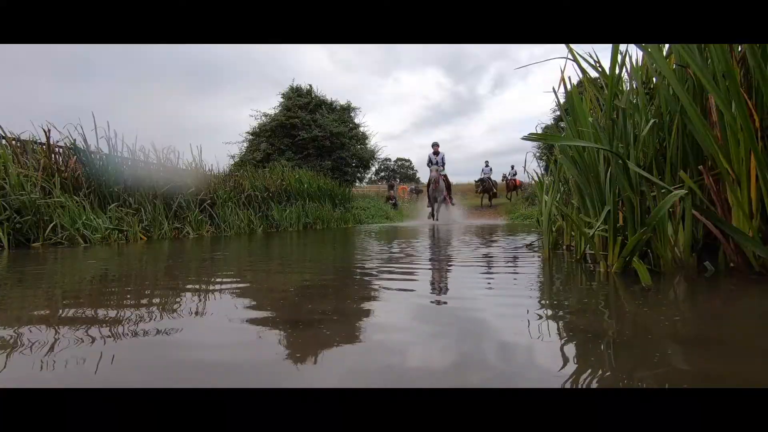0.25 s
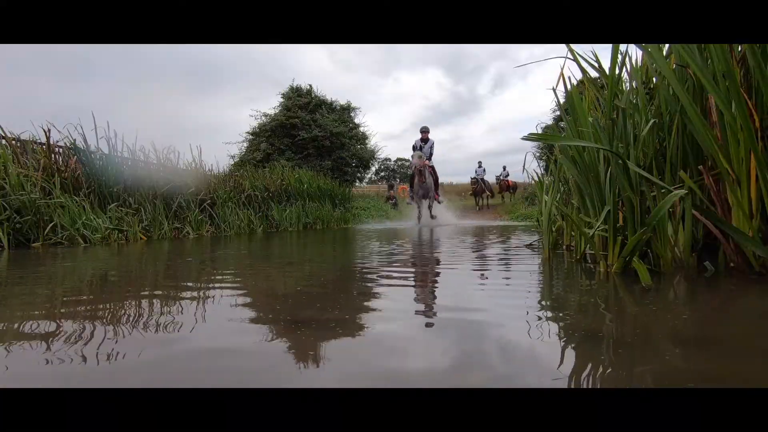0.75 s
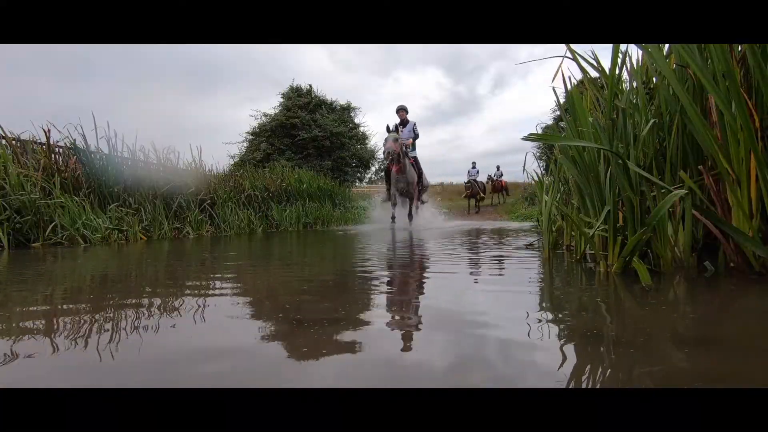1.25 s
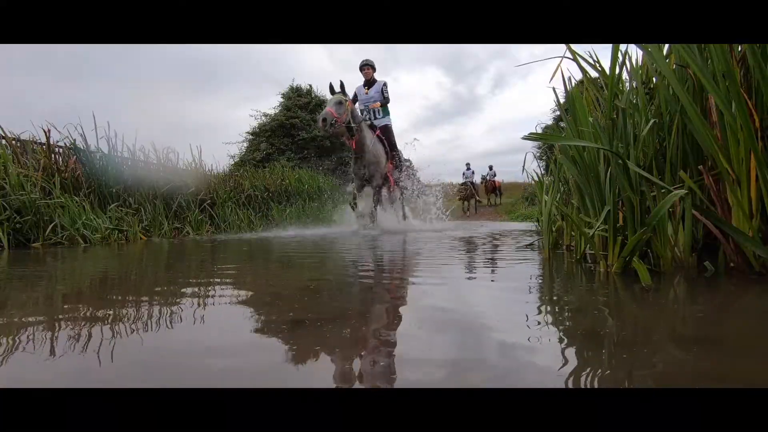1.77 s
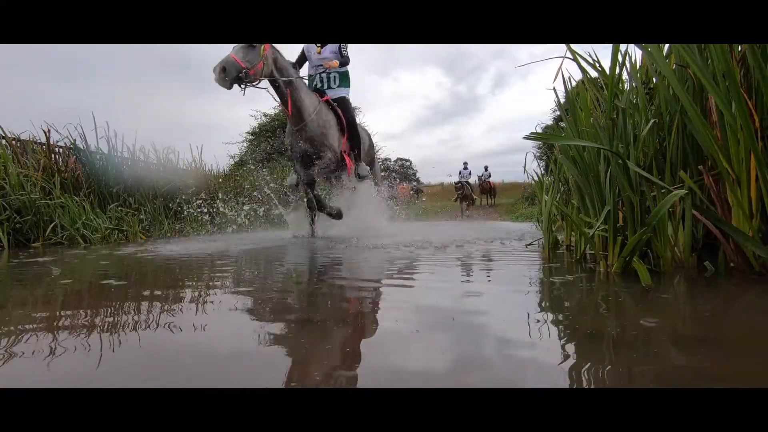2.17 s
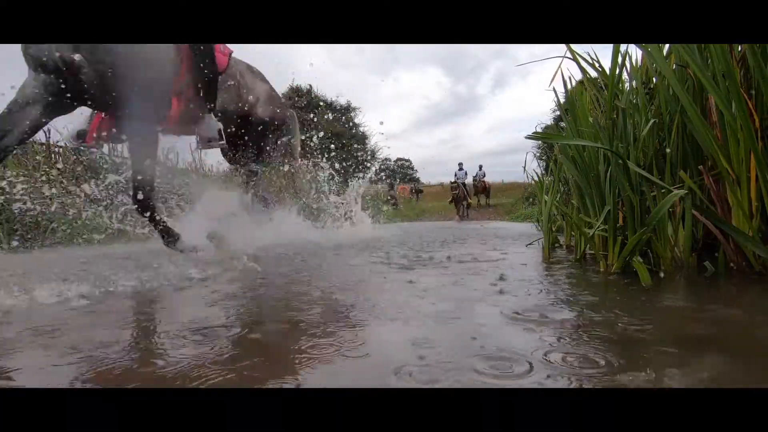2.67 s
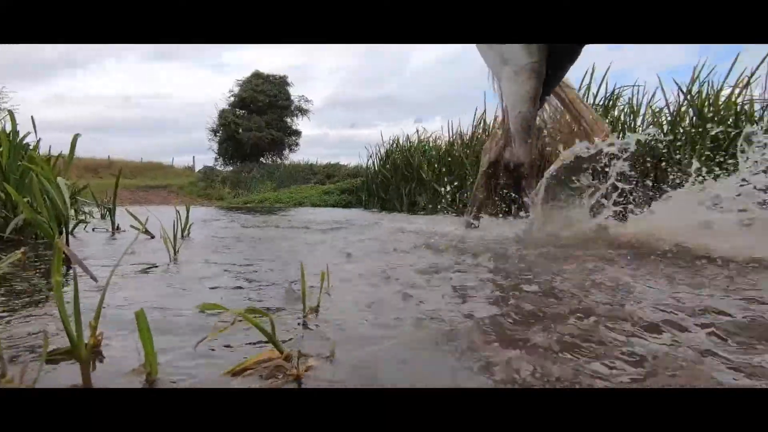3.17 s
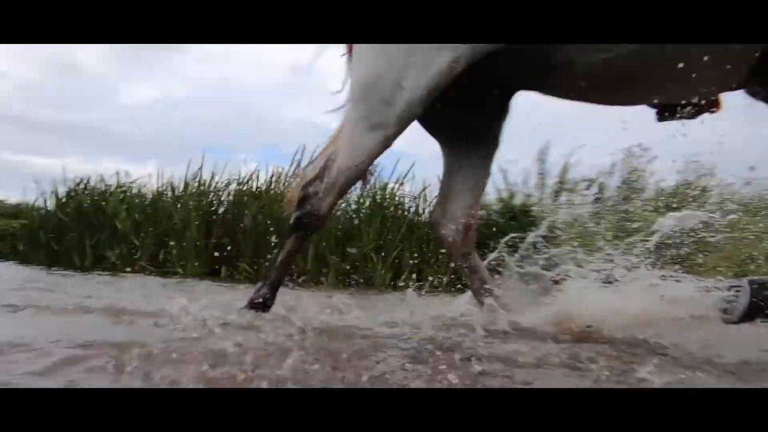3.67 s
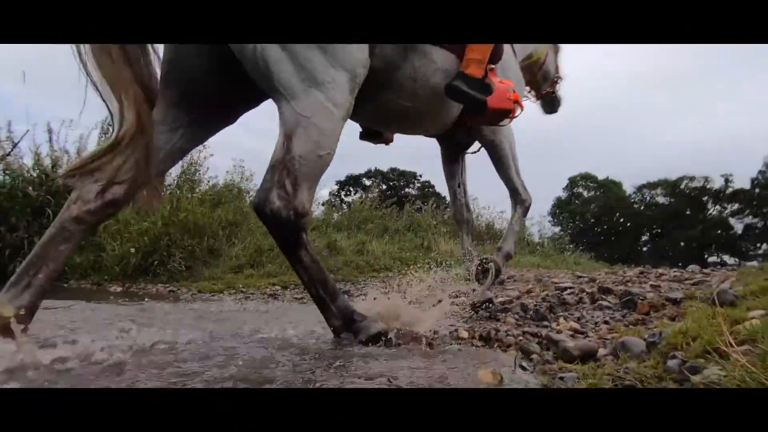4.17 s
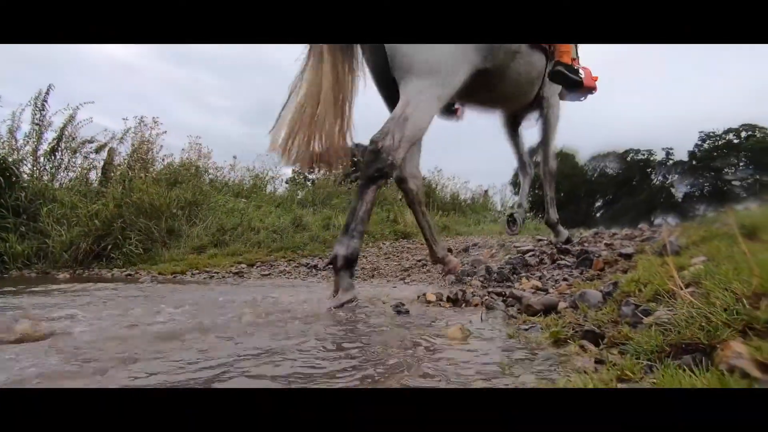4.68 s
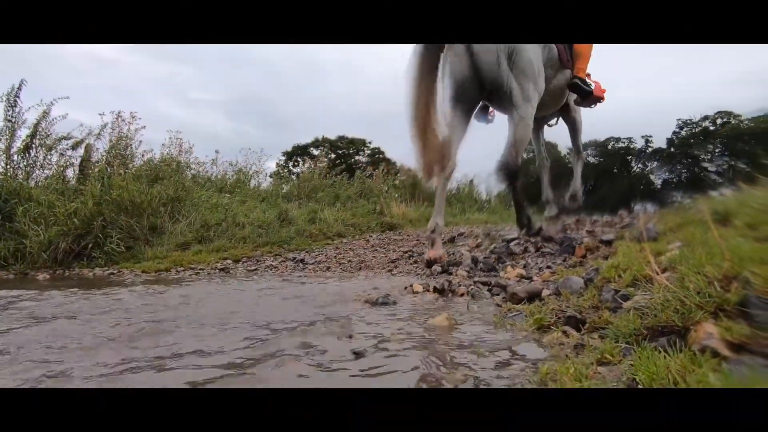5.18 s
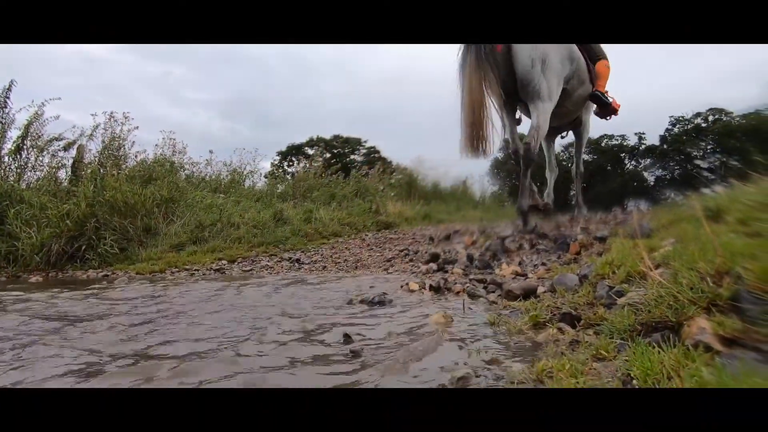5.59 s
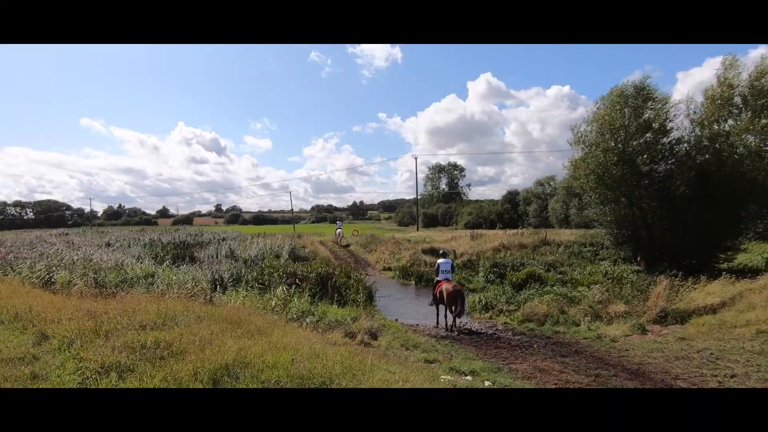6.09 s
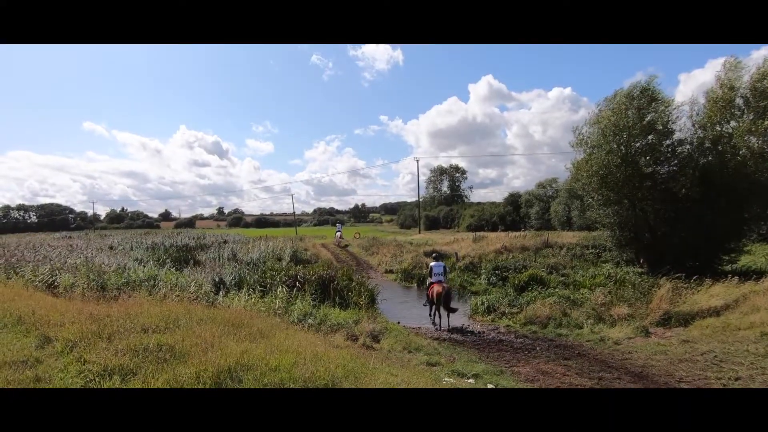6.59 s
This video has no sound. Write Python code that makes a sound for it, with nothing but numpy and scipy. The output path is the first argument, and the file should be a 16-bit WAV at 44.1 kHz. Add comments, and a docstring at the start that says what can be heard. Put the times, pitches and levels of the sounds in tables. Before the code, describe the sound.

A horse trots closer through a shallow ford with muffled plopping splashes, clambers out over clicking pebbles, then wades far off under low wind rumble.

```python
"""A horse trots up through a shallow ford: ringing air pockets plop, noise bursts smack, bubble streams churn and spray.
Wet microphone ports muffle it; from 1.7 s the left one drains, turns phase ahead and lets in bright spray.
From 3 s, in a second view, the horse climbs out over pebbles: short pitched knocks, gliding glugs and low wind,
with a gust thumping on the microphone from 4.25 to 4.38 s. From 6 s, in a third view up the field,
a horse wades far off in thin noise cracks and small plops, while low wind noise buffets the microphone."""
import sys
import numpy as np
from scipy import signal
from scipy.fft import rfft, irfft, next_fast_len
from scipy.io import wavfile
from scipy.ndimage import uniform_filter1d, minimum_filter1d, map_coordinates

SR = 44100
rng = np.random.default_rng(int(sys.argv[2]) if len(sys.argv) > 2 else 0)


def digitize_waveform(pressure):
    """Quantize a signal to 16-bit integers and store it at the path in sys.argv[1].

    Rows of a 2-D input are taken as channels; values are limited to [-1, 1].
    """
    field = np.atleast_2d(pressure).T
    bounded = np.clip(field, -1, 1)
    quanta = np.round(bounded * 32767).astype(np.int16)
    wavfile.write(sys.argv[1], SR, quanta)


N = 301671

# Event levels in the tables are before each layer's level_db trim; colours are relative, as coloured() sets rms 1.
# Largest air pockets opened by the hooves. Each row: start in seconds, level in dB, first pitch in Hz, t60 in seconds.
POCKETS = [(0.107, -17.5, 213, 0.057), (0.126, -15.5, 172, .025), (0.156, -10, 170, 0.04),
           (.297, -11, 580, 0.0078), (0.331, -15.5, 434, 0.085), (0.394, -12, 228, 0.0145),
           (0.458, -14, 402, 0.01), (0.529, -18, 238, 0.025), (.605, -21, 1840, 0.033),
           (.607, -13.5, 618, 0.018), (.742, -10.5, 307, 0.013), (0.782, -13.5, 272, 0.014),
           (.826, -14.5, 198, 0.019), (.838, -2, 222, 0.022), (.903, -13, 756, 0.014),
           (.92, -17.5, 527, 0.079), (1.153, -18.5, 568, 0.069), (1.187, -11, 277, 0.027),
           (1.217, -13, 226, 0.041), (1.291, -12.5, 273, 0.024), (1.504, -16, 158, 0.039),
           (1.521, -11, 385, 0.045), (1.551, -10, 308, 0.021), (1.589, -17, 127, 0.038),
           (1.593, -4.5, 326, 0.015), (1.824, -0.5, 300, 0.016), (1.842, -10, 240, 0.032),
           (1.895, -17, 447, 0.042), (1.981, -12.5, 213, 0.025), (2.17, -10.5, 340, 0.024),
           (2.204, -10.5, 464, 0.018), (2.245, -12, 210, 0.038), (2.277, -13.5, 236, 0.071),
           (2.369, -21, 620, 0.021), (2.425, -19, 238, 0.024), (2.477, -14, 145.3, 0.054),
           (2.496, -15, 262, 0.056), (2.534, -21, 474, 0.012), (2.579, -13, 215, 0.02),
           (2.693, -16.5, 341, 0.025), (2.806, -24, 230, 0.022), (2.843, -7, 356, 0.017),
           (2.889, -16, 597, 0.027), (3.072, -13.5, 440, 0.011), (3.206, -6, 536, 0.017),
           (3.229, -7, 349, 0.039), (3.23, -15.5, 155, 0.034), (3.742, -10.5, 510, 0.018),
           (4.571, -27, 334, 0.018), (4.712, -21, 332, 0.0068)]
# Hooves smacking the water. Each row: start in seconds, peak in dB, centre in Hz, t60 in seconds.
SMACKS = [(.157, -16, 604, 0.067), (.295, -16.5, 650, 0.058), (0.459, -17.5, 900, 0.063),
          (.604, -14, 1100, 0.063), (0.902, -33, 750, 0.072), (1.151, -21, 475, 0.054),
          (1.187, -14.5, 900, 0.057), (1.455, -15, 550, 0.095), (1.524, -12.5, 630, 0.1),
          (1.822, -12, 600, 0.12), (2.203, -6, 700, 0.11), (2.466, -11, 785, .05),
          (2.533, -11.5, 700, 0.046), (2.784, -11, 1590, 0.036), (2.804, -10, 1600, .04),
          (2.844, 1, 1190, 0.019), (2.891, -9.5, 900, 0.042), (2.992, -13, 1100, .014),
          (3.011, -28, 1300, .012), (3.501, -27, 900, 0.046), (3.743, -9, 910, 0.079),
          (4.18, -12, 1200, 0.029), (4.191, -10, 1110, 0.026), (4.536, -28, 1280, 0.029),
          (4.6993, -14, 1100, 0.012), (4.713, -16, 1290, .045), (4.738, -16, 1300, 0.02),
          (5.1878, -19, 1600, 0.02), (5.227, -18, 1400, 0.03), (5.333, -19.5, 990, 0.031),
          (5.517, -33, 1010, .03)]
# Wet bed letting go of a hoof. Each row: start in seconds, level in dB, length in seconds,
# first pitch in Hz, last pitch in Hz, roughness from 0 to 1.
GLUGS = [(1.976, -25, 0.015, 834, 1190, 0.5), (2.207, -28, 0.016, 2020, 2210, 0.2),
         (3.024, -32, 0.028, 976, 1630, 0.5), (3.289, -23.5, 0.052, 500, 576, 0.33),
         (3.371, -26.5, 0.107, 415, 529, 0.6), (4.442, -26.5, 0.035, 794, 740, 0.58),
         (4.494, -39, 0.01, 1880, 2250, 0), (4.621, -20, 0.034, 876, 930, 0.5),
         (4.81, -25, 0.023, 793, 750, 0.5), (5.269, -20, 0.04, 713, 668, 0.4),
         (5.308, -24.5, 0.0734, 751, 625, 0.77), (5.617, -26.5, 0.042, 565, 1077, 0.55),
         (5.877, -26, 0.017, 760, 895, 0.25)]
# Hooves knocking on stones. Each row: start in seconds, level in dB, first pitch in Hz.
KNOCKS = [(3.517, -15, 800), (3.529, -18, 960), (3.568, -19, 1310), (3.643, -17, 1280), (3.66, -20, 1150),
          (3.692, -15.5, 1670), (3.723, -12.5, 1910), (3.756, -8, 686), (4.003, -9, 734),
          (4.196, -15.5, 1050), (4.221, -13, 1360), (4.538, -15.5, 1350), (4.588, -16.5, 1150),
          (4.702, -10.5, 970), (4.712, -11.5, 1190), (4.745, -16.5, 1130), (4.856, -25.5, 1090),
          (4.93, -23.5, 786), (5.011, -13, 1020), (5.076, -21.5, 760), (5.104, -25, 900),
          (5.186, -14.5, 1090), (5.224, -12.5, 860), (5.335, -26, 1200), (5.464, -23, 716),
          (5.597, -29, 900), (5.654, -24, 1040), (5.707, -23, 1090), (5.762, -20.5, 1120),
          (5.789, -18, 1170), (5.849, -17.5, 1050), (5.897, -20, 930)]
# Low thumps: the horse's weight through the ground, and a wind gust buffeting the microphone from 4.25 to 4.38 s.
# Each row: start in seconds, level in dB.
THUMPS = [(0.839, -28.5), (1.6, -28), (1.83, -26), (2.17, -30), (2.475, -26.5), (2.8, -27.5), (3.23, -34),
          (3.505, -50), (3.585, -35), (3.824, -24.5), (4.005, -25), (4.252, -22), (4.285, -16),
          (4.342, -18.5), (4.376, -22), (4.711, -27), (5.006, -29.5), (5.094, -36.5), (5.22, -46),
          (5.707, -29.5)]
# Flung drops ticking on the camera. Each row: start in seconds, peak in dB, centre in Hz, t60 in seconds.
TICKS = [(0.103, -34.5, 3300, 0.028), (.157, -34.5, 3800, .03), (.532, -40, 3800, .015),
         (.779, -40.5, 5900, 0.013), (1.0537, -40, 4500, .025), (1.238, -39, 4600, 0.039),
         (1.456, -38.5, 4200, .04), (2.5486, -22, 3550, 0.012), (2.712, -20, 3400, 0.019),
         (2.781, -19, 3000, .02), (2.801, -17, 3300, .03), (2.875, -20, 2800, .02),
         (2.921, -17, 3300, .016), (2.976, -18, 3000, .008), (2.992, -21, 2600, 0.0047),
         (3.011, -28, 2900, 0.011), (3.0298, -29.5, 3000, 0.008), (3.039, -33, 3100, .008),
         (3.063, -38, 3800, .008), (3.154, -38, 5200, 0.0072), (3.266, -50, 2800, 0.0087),
         (3.4195, -27, 2800, 0.009), (3.5703, -25, 2500, 0.015), (3.622, -39, 5000, .012),
         (3.66, -29, 2800, 0.034), (3.69, -20.5, 2320, 0.02), (3.7238, -17, 2750, 0.021),
         (3.779, -39, 5360, 0.0078), (3.824, -21, 2400, 0.032), (3.835, -25, 2880, 0.047),
         (3.884, -34, 2800, 0.067), (3.9212, -28.5, 3100, 0.0077), (4.1796, -27, 2950, 0.038),
         (4.192, -25.5, 2930, 0.044), (4.2193, -28, 2900, .02), (4.342, -40, 3300, 0.015),
         (4.528, -45, 2700, 0.011), (4.68, -32, 2100, 0.014), (4.712, -29.5, 2800, .03),
         (4.738, -35.5, 2700, .04), (4.826, -41, 3300, .012), (5.2156, -44, 3500, 0.018),
         (5.225, -32.5, 3100, 0.03), (5.518, -48, 3000, 0.013), (5.7075, -58, 2600, .02),
         (5.756, -29, 4300, 0.027), (5.8966, -44, 3000, 0.013)]
# Hooves plunging in on the way up. Each row: start in seconds, length in seconds, then churn, slosh and spray in dB.
STEPS_COMING = [(0.069, 0.036, -24, -34.5, -46.5), (0.156, 0.012, -24, -40, -57.5),
                (0.294, 0.011, -20.5, -49, -59), (.385, 0.009, -30, -34.5, -54),
                (0.462, 0.031, -26.5, -31, -52), (0.605, 0.0041, -27.5, -35, -62),
                (0.781, 0.044, -23, -37, -55.5), (0.9, 0.038, -21.5, -29, -56.5),
                (1.15, 0.018, -24.5, -40, -70), (1.187, 0.054, -27.5, -31, -57),
                (1.458, 0.0097, -21.5, -33, -52.5), (1.492, 0.083, -21, -34, -55.5),
                (1.758, 0.075, -33.5, -39.5, -50), (1.818, 0.065, -23, -32.5, -61.5),
                (2.132, 0.06, -29, -28.5, -55), (2.203, 0.11, -23, -25.5, -49),
                (2.469, 0.038, -24.5, -25, -34), (2.533, 0.0081, -20.5, -22.5, -50),
                (2.678, 0.029, -37, -41, -39.5), (2.783, 0.082, -29.5, -26, -32.5),
                (2.84, 0.012, -23.5, -34.5, -63), (2.89, 0.0091, -26.5, -48, -53)]
# Hooves on the way out. Each row: start in seconds, length in seconds, then churn, slosh and spray in dB.
STEPS_GOING = [(3.095, 0.0087, -39, -37, -61), (3.197, 0.014, -19.5, -35.5, -59),
               (3.499, 0.022, -21.5, -30.5, -43), (3.567, 0.014, -26.5, -32.5, -57),
               (3.641, 0.008, -52, -35, -47), (3.742, 0.0068, -27.5, -26, -49),
               (3.822, 0.01, -41, -30, -52), (3.873, 0.043, -27, -36, -64),
               (3.994, 0.0096, -30.5, -29, -46.5), (4.178, 0.031, -22.5, -20.5, -43.5),
               (4.28, 0.096, -33.5, -40, -63.5), (4.53, 0.0061, -35, -28.5, -46),
               (4.702, 0.039, -26.5, -26, -44), (5.003, 0.011, -34.5, -45, -57),
               (5.188, 0.0048, -32, -29, -51), (5.213, 0.0079, -30.5, -29.5, -44),
               (5.318, 0.048, -36.5, -41, -57), (5.548, .03, -42, -47, -59), (5.64, 0.0068, -44, -37, -61),
               (5.756, 0.044, -40, -36.5, -54)]
# Stirred water between the steps coming. Each row: time in seconds, then churn, slosh and spray in dB.
WASH_COMING = [(0, -30, -43.5, -60.5), (.34, -35.5, -46, -65.5), (.65, -36, -38.5, -56),
               (1.02, -43, -46.5, -67.5), (1.12, -28.5, -39, -58), (1.68, -43.5, -49.5, -60.5),
               (2.06, -50, -38, -48.5), (2.17, -43, -39, -39), (2.28, -42, -41, -48),
               (2.4, -59, -37, -38.5), (2.6, -56, -32, -44), (2.75, -50, -32.5, -39), (2.97, -33, -33, -37)]
# Stirred water between the steps going. Each row: time in seconds, then churn, slosh and spray in dB.
WASH_GOING = [(3, -32.5, -36, -45.5), (3.1, -33, -37.5, -53.5), (3.17, -33, -36, -48),
              (3.28, -37.5, -49.5, -60), (3.42, -34, -45, -48.5), (3.66, -34, -31, -43.5),
              (3.8, -32, -38, -52.5), (3.97, -53, -43.5, -57), (4.08, -40.5, -34.5, -52.5),
              (4.4, -42.5, -40, -56.5), (4.85, -40.5, -41, -54.5), (4.97, -48, -50.5, -65.5),
              (5.08, -42.5, -41.5, -57), (5.39, -53, -55.5, -63.5), (5.49, -51, -66, -66),
              (5.62, -36.5, -43.5, -59.5), (5.73, -43.5, -50, -64), (5.9, -46, -48, -61),
              (5.96, -49.5, -49.5, -59.5)]
# Dying of a splash after its hold. One row: churn, slosh and spray fall in dB per second.
SPLASH_FALLS = (325.5, 424, 369)
# Spectrum of the water coming. Each row: frequency in Hz, density in dB per Hz.
COMING_COLOUR = [(45, -16), (110, -11), (200, -2), (380, -6), (600, -4.5), (880, -8.5), (1130, -24),
                 (1450, -16.5), (1950, -24), (2150, -26.5), (2400, -38.5), (3300, -42.5), (4200, -50.5),
                 (10000, -92)]
# Spectrum of the water going, and of glug froth. Each row: frequency in Hz, density in dB per Hz.
GOING_COLOUR = [(70, -30.5), (130, -2), (260, -3), (350, -1.5), (560, 1), (750, 2.5), (1050, -12),
                (1500, -8), (1800, -16.5), (2100, -21), (2450, -35), (3500, -38), (4700, -43.5),
                (6500, -48.5), (11000, -85)]
# Treble let in by the drained port. Each row: time in seconds, level in dB.
BRIGHT_SPRAY = [(1.6, -89.5), (1.79, -58), (1.88, -64), (2.15, -49.5), (2.3, -53.5), (2.43, -43),
                (2.56, -56.5), (2.65, -48), (2.7, -42.5), (2.76, -46), (2.81, -41.5), (2.86, -50),
                (2.95, -40.5)]
# Sheets of spray landing beside the drained port. Each row: start in seconds, length in seconds, level in dB.
SHEETS = [(2.473, 0.0048, -33.5), (2.535, 0.0068, -45), (2.665, 0.0066, -40.5), (2.71, 0.0095, -33),
          (2.78, 0.008, -33), (2.801, 0.012, -30)]
# Spectrum of that bright spray. Each row: frequency in Hz, density in dB per Hz.
BRIGHT_COLOUR = [(3000, -10), (4500, -7), (6000, -5), (8300, -8.5), (9200, -10), (10000, -14.5),
                 (11300, -24), (12500, -20.5), (15700, -27)]
# Spectrum of the sheets. Each row: frequency in Hz, density in dB per Hz.
SHEET_COLOUR = [(1500, 2.5), (3000, 1), (5000, -8.5), (9000, -9.5), (11000, -22), (15700, -33.5)]
# Spectrum of the high fizz at the left port. Each row: frequency in Hz, density in dB per Hz.
FIZZ_COLOUR = [(10500, -48.5), (11500, -14.5), (12300, -5), (14000, -10), (15700, -9)]
# Phase lead of the open port over the wet one. Each row: frequency in Hz, lead in radians.
PORT_LEAD = [(100, 0), (330, .2), (500, .8), (700, 1.9), (1000, 3), (1500, 3.4), (2800, 4.7), (6000, 5.5)]
# Resonances and notches of the microphone housing. Each row: centre in Hz, width in Hz, gain in dB.
HOUSING = [(1390, 42, 1.5), (2670, 32, 0.5), (2790, 48, 3.5), (3420, 27, 2.5), (3570, 63, 1.5),
           (4100, 26, 5), (4600, 140, -6.5), (8900, 120, 3.5), (9320, 150, 4)]
# Far hooves smacking the water. Each row: start in seconds, peak in dB, centre in Hz, t60 in seconds.
FAR_SPLASHES = [(6.124, -36, 2650, .03), (6.172, -36, 2800, 0.093), (6.217, -32, 2800, 0.069),
                (6.241, -17.5, 2680, 0.11), (6.249, -17, 2700, 0.036), (6.2804, -25, 2920, 0.15),
                (6.3594, -25, 2070, 0.085), (6.453, -37, 2300, 0.066), (6.6916, -35, 2500, 0.025),
                (6.7061, -19, 2630, 0.041), (6.715, -20.5, 1620, 0.039), (6.733, -21.5, 2800, 0.054),
                (6.818, -35, 2970, 0.07)]
# Air pockets under the far horse. Each row: start in seconds, level in dB, first pitch in Hz, t60 in seconds.
FAR_POCKETS = [(6.125, -40, 440, 0.021), (6.231, -32, 444, 0.019), (6.248, -35, 1140, 0.024),
               (6.279, -41, 740, 0.045), (6.339, -31.5, 1800, 0.024), (6.371, -36, 785, 0.026),
               (6.667, -33.5, 960, 0.052), (6.716, -23, 910, 0.0085), (6.797, -38, 704, 0.07)]
# Far strides. Each row: start in seconds, length in seconds, wash in dB.
FAR_STEPS = [(6.243, 0.029, -39.5), (6.3, 0.036, -46.5), (6.655, 0.03, -45), (6.735, 0.0042, -37.5),
             (6.78, 0.045, -57.5)]
# Spectrum of the far wading. Each row: frequency in Hz, density in dB per Hz.
WADING_COLOUR = [(400, -21), (700, -8), (900, -18.5), (1100, -5), (1900, -10.5), (2700, -4), (3500, -10),
                 (4400, -27.5), (5400, -40.5), (7000, -25.5), (9000, -37), (14000, -57)]
# Wind at the bank. Each row: time in seconds, buffeting in dB.
BREEZE = [(3, -54), (3.7, -60.5), (4.02, -36), (4.22, -27), (4.27, -30), (4.36, -30), (4.48, -36),
          (4.9, -45.5), (5.4, -54), (5.95, -45.5)]
# Wind in the field. Each row: time in seconds, buffeting in dB.
GUSTS = [(5.99, -34), (6.016, -14), (6.032, -19.5), (6.07, -28.5), (6.84, -31)]
# Spectrum of the bank wind, and of the low thumps. Each row: frequency in Hz, density in dB per Hz.
BREEZE_COLOUR = [(11, -36), (18, -12), (43, 13), (119, 2), (188, 2.5), (285, -17), (348, -24), (450, -27),
                 (580, -37), (990, -120)]
# Spectrum of the field wind. Each row: frequency in Hz, density in dB per Hz.
GUST_COLOUR = [(11, -44), (18, -8.5), (48, -5.5), (121, -7), (194, -20), (217, -26.5), (233, -26.5),
               (406, -45), (500, -40), (650, -88), (1100, -120)]
# Steady background at the ford. Each row: frequency in Hz, density in dB per Hz.
FORD_FLOOR = [(15, -50.5), (25, -15.5), (97, -4.5), (221, 3), (365, -8.5), (574, -4), (815, -6),
              (1100, -23.5), (1770, -13.5), (2460, -35.5), (6060, -37.5), (10000, -70), (13000, -109),
              (22000, -120)]
# Steady background at the bank. Each row: frequency in Hz, density in dB per Hz.
BANK_FLOOR = [(59, -31.5), (100, -14), (467, -13), (700, 17), (935, -6), (1510, -23.5), (2400, -43.5),
              (3600, -30), (10000, -41), (13000, -87), (22000, -120)]
# Steady background in the field. Each row: frequency in Hz, density in dB per Hz.
FIELD_FLOOR = [(400, -16), (720, 1), (900, -3), (1100, 5), (2000, 0), (3000, -9), (4400, -7), (5400, -20),
               (8000, -25), (9500, -29), (12000, -31), (15000, -67)]
# Where one view gives way to the next. One row: start of the second and of the third in seconds.
VIEW_STARTS = (2.98, 5.98)

# smaller bubbles shed by each pocket: level, most octaves above it, latest delay
SHED_DB, SHED_OCTAVES, SHED_S = -14.5, 1.4, 0.023
SMACK_OCTAVES, MUFFLE_HZ = 1.38, 1900  # reach of a smack either side; the wet ports pass little above this
CRACK_TOP_HZ = 7200  # treble corner of the cracks
GLUG_EDGE, GLUG_SAG_DB, GLUG_OVERTONE_DB = 7.1, 6.5, -22  # steepness of its start and stop; loss on the way; octave
GLUG_FLUTTER_DB, GLUG_DRIFT_RAD, GLUG_FROTH_DB = 5.5, 1.8, -13  # stutter, wander and froth of a fully rough note
KNOCK_T60_S = 0.0078
THUMP_S, THUMP_FALL_DB_PER_S = 0.0089, 399.5
RISE_DB_PER_S, SAG_DB_PER_S = 2198.5, 22  # a splash leaps up, then sags while the leg ploughs on
DRAIN_S, DRAIN_TIME_S, DRAINED_SHARE = 1.703, 0.26, 0.77  # start of draining, time constant, final openness
SHEET_FALL_DB_PER_S = 698
FAR_WASH_DB, FAR_FALL_DB_PER_S = -58, 181  # ripples between far strides; how fast a far splash dies
FAR_DROPS_DB = -12  # single far drops, before the stride gain
CEILING, TOP_HZ = 0.65, 15730  # limiter ceiling as a share of full scale; band limit


def amp(db):
    """Decibels to linear gain."""
    return 10 ** (np.asarray(db) / 20)


def unit(x):
    """Scale x to rms 1."""
    return x / np.sqrt(np.mean(x ** 2) + 1e-20)


def along(points, hz):
    """Read (Hz, value) points on a log frequency axis."""
    f, value = np.transpose(points)
    return np.interp(np.log(hz + 1), np.log(f + 1), value)


def curves(rows):
    """One value per sample for each column after the time."""
    s, *columns = np.transpose(rows)
    return [np.interp(np.arange(N) / SR, s, column) for column in columns]


def wobble(rate):
    """A smooth random curve with rate knots a second."""
    knots = rng.standard_normal(int(N * rate / SR) + 4)
    return map_coordinates(knots, [np.arange(N) * rate / SR])


def filtered(x, response):
    """Shape x with a (complex) response of frequency."""
    size = next_fast_len(N + SR // 2)
    hz = np.fft.rfftfreq(size, 1 / SR)
    return irfft(rfft(x, size) * response(hz), size)[..., :N]


def coloured(x, colour, lo_hz=10, hi_hz=20000):
    """Give x a spectrum between two soft band edges, at rms 1."""
    def response(hz):
        low_edge = 1 + (lo_hz / (hz + 1)) ** 12
        high_edge = 1 + (hz / hi_hz) ** 12
        return amp(along(colour, hz)) * (low_edge * high_edge) ** -.5
    return unit(filtered(x, response))


def resonance(x, centre_hz, width_hz):
    """The part of x that rings in one resonance."""
    def response(hz):
        loss = 1j * hz * width_hz
        return loss / (centre_hz ** 2 - hz ** 2 + loss)
    return filtered(x, response)


def add(track, s, sound):
    """Mix a sound in at time s."""
    start = max(round(s * SR), 0)
    part = track[start:start + len(sound)]
    part += sound[:len(part)]


def swells(rows, fall_db_per_s):
    """Gain of (start, length, dB) events: each leaps up, holds with a sag and dies away."""
    t, power = np.arange(N) / SR, np.zeros(N)
    for s, length, db in rows:
        near = slice(max(int((s - .1) * SR), 0), int((s + length + .5) * SR))
        age = t[near] - s
        rise = np.minimum(age, 0) * RISE_DB_PER_S
        sag = np.clip(age, 0, length) * SAG_DB_PER_S
        fall = np.maximum(age - length, 0) * fall_db_per_s
        power[near] += amp(db + rise - sag - fall) ** 2
    return np.sqrt(power)


def pockets(cycles, count):
    """The big pockets plop and break up into smaller, higher bubbles that ring a moment later."""
    shed = []
    for (s, db, hz, _), chances in zip(POCKETS, rng.random((len(POCKETS), count, 2))):
        for late, small in chances:
            pitch = hz * 2 ** (SHED_OCTAVES * small)
            shed.append((s + SHED_S * late, db + SHED_DB - 4 * small, pitch, cycles / pitch))
    big = plops(POCKETS, level_db=-.5, rise=0.0087, slap_db=-29.5, slap_t60=0.036)
    return big + plops(shed, level_db=-1.5, rise=0.02, slap_db=-28.0, slap_t60=.015)


def plops(rows, level_db, rise, slap_db, slap_t60):
    """A struck hollow swells and rings out as a slightly rising sine, under a short soft slap of noise."""
    track, t = np.zeros(N), np.arange(SR // 7) / SR
    soft = signal.butter(4, 1500, fs=SR, output="sos")
    for s, db, hz, t60 in rows:
        swell = (1 - np.exp(-8 * t / t60)) ** 2 * amp(-60 * t / t60)
        turns = hz * t * (1 + rise * np.minimum(t / t60, 1)) + rng.random()
        ring = swell / swell.max() * np.sin(2 * np.pi * turns)
        slap = unit(signal.sosfilt(soft, rng.standard_normal(len(t))))
        slap = slap * amp(-60 * t / slap_t60) * (1 - np.exp(-t / 0.00022))
        add(track, s, amp(db + level_db) * (ring + amp(slap_db) * slap))
    return track


def smacks(level_db, grain_db):
    """A flat hoof hits the water: a broad, sudden burst, muffled by the wet ports."""
    track = np.zeros(N)
    muffle = signal.butter(8, MUFFLE_HZ, fs=SR, output="sos")
    reach = 2 ** SMACK_OCTAVES
    for s, db, hz, t60 in SMACKS:
        band = signal.butter(1, [hz / reach, hz * reach], "band", fs=SR, output="sos")
        smack = signal.sosfilt(np.vstack([band, band, muffle]), burst(t60, grain_db))
        add(track, s, amp(db + level_db) * smack / np.abs(smack).max())
    return track


def burst(t60, grain_db):
    """Water breaks as dying noise with a random grain, whose size starts at its upper limit."""
    t = np.arange(SR // 7) / SR
    sizes = np.clip(rng.standard_normal(128), -2, 1.5)
    sizes[:2] = 1.5
    grain = amp(grain_db * np.interp(t, np.linspace(0, t[-1], len(sizes)), sizes))
    return rng.standard_normal(len(t)) * grain * amp(-60 * t / t60)


def glugs(level_db):
    """Water refills a hoofprint: the hollow sings an unsteady, gliding note and spits froth once a cycle."""
    track = np.zeros(N)
    froth = coloured(rng.standard_normal(N), GOING_COLOUR, lo_hz=603, hi_hz=2300)
    for s, db, length, first_hz, last_hz, rough in GLUGS:
        u = np.linspace(0, 1, int(length * SR))
        flutter, drift = wobble(200)[:len(u)], wobble(250)[:len(u)]
        glide_hz = first_hz * (last_hz / first_hz) ** u
        phase = 2 * np.pi * np.cumsum(glide_hz) / SR + GLUG_DRIFT_RAD * rough * drift
        spit = amp(GLUG_FROTH_DB) * rough * (1 + np.sin(phase)) * froth[int(s * SR):][:len(u)]
        note = np.sin(phase) + amp(GLUG_OVERTONE_DB) * np.sin(2 * phase) + spit
        swell = np.tanh(GLUG_EDGE * np.sin(np.pi * u)) ** 2 * amp(-GLUG_SAG_DB * u)
        stutter = unit(amp(GLUG_FLUTTER_DB * rough * flutter))
        add(track, s, amp(db + level_db) * swell * stutter * note)
    return track


def knocks(level_db):
    """A hoof on stone rings for a few milliseconds, with a softer tail of noise."""
    rows = [(*knock, KNOCK_T60_S) for knock in KNOCKS]
    return plops(rows, level_db, rise=0.0083, slap_db=-19, slap_t60=0.032)


def thumps(level_db):
    """Short low noise bursts: weight through the ground, and from 4.25 to 4.38 s a gust on the microphone."""
    gain = swells([(s, THUMP_S, db) for s, db in THUMPS], THUMP_FALL_DB_PER_S)
    return amp(level_db) * gain * coloured(rng.standard_normal(N), BREEZE_COLOUR, lo_hz=60.5, hi_hz=300)


def cracks(rows, level_db, width, grain_db):
    """Each hit is a sudden crackle of noise around one pitch that dies away."""
    track = np.zeros(N)
    soft = signal.butter(2, CRACK_TOP_HZ, fs=SR, output="sos")
    for s, db, hz, t60 in rows:
        edges = [hz / (1 + width), min(hz * (1 + width), SR * .45)]
        band = signal.butter(2, edges, "band", fs=SR, output="sos")
        crack = signal.sosfilt(np.vstack([band, soft]), burst(t60, grain_db))
        add(track, s, amp(db + level_db) * crack / np.abs(crack).max())
    return track


def stirring(steps, wash):
    """Churn, slosh and spray levels in dB: the steps stand on the wash between them."""
    steps = np.array(steps)
    levels = []
    for db, fall, bed in zip(steps[:, 2:].T, SPLASH_FALLS, curves(wash)):
        gain = swells(np.column_stack([steps[:, :2], db]), fall)
        levels.append(20 * np.log10(np.hypot(gain, amp(bed))))
    return levels


def splashing(levels, colour, churn_db, slosh_db, spray_db, drip_db, rate, lump_db, flicker_db):
    """Big bubbles churn, smaller ones slosh, drops patter in flurries and some drip singly; all falls in lumps."""
    churn, slosh, spray = levels
    lumps = amp(lump_db * wobble(90))
    big = coloured(bubbles(rate, 108.3, 1068, 9.04, 2.34, 0.63), colour, hi_hz=800)
    small = coloured(bubbles(2 * rate, 754, 2535, 19.1, 2.6, 0.3), colour, 937, 1800)
    patter = coloured(bubbles(1800, 2165, 9270, 18.0, 3.2, 1.0), colour, lo_hz=2320)
    patter = unit(amp(flicker_db * wobble(110)) * patter)
    drips = coloured(bubbles(41, 2300, 7200, 2.5, 2.1, 0), colour, lo_hz=2200)
    drops = patter + amp(drip_db) * drips
    water = amp(churn + churn_db) * big + amp(slosh + slosh_db) * small
    return lumps * (water + amp(spray + spray_db) * drops)


def bubbles(rate, lo_hz, hi_hz, cycles, spread_db, foam):
    """rate bubbles a second ring about so many cycles, rising in pitch, over a share of white foam noise."""
    count = int(rate * N / SR)
    when, pitch, size, life = rng.random((count, 4)).T
    hz = lo_hz * (hi_hz / lo_hz) ** pitch
    length = np.ceil(cycles * (.5 + life) / hz * SR).astype(int)
    # all the rings laid end to end: which bubble each sample is of, and its age in samples
    which = np.repeat(np.arange(count), length)
    age = np.arange(len(which)) - np.repeat(np.cumsum(length) - length, length)
    u = age / length[which]
    # the strongest bubbles are rare
    strength = hz * amp(spread_db * np.minimum(-np.log(1 - size), 3))
    tone = np.sin(2 * np.pi * hz[which] * age / SR * (1 + 0.054 * u))
    ring = strength[which] * tone * amp(-45 * u) * (1 - np.exp(-12 * u))
    stream = np.bincount((when * N).astype(int)[which] + age, ring, N)[:N]
    return unit(stream) + foam * rng.standard_normal(N)


def ports(water, open_db, bright_db, leak_db, hollow_db, choke):
    """As the left port drains, its phase runs ahead of the wet right one and bright spray gets in."""
    draining_s = np.maximum(np.arange(N) / SR - DRAIN_S, 0)
    share = DRAINED_SHARE * (1 - np.exp(-draining_s / DRAIN_TIME_S))
    # a hollow note grows in both ports; the wet one loses a band above it
    water = water + share * amp(hollow_db) * resonance(water, centre_hz=1150, width_hz=490)
    wet = water - share * choke * resonance(water, centre_hz=1584, width_hz=670)
    opened = amp(open_db) * filtered(water, lambda hz: np.exp(1j * along(PORT_LEAD, hz)))

    spray_db, = curves(BRIGHT_SPRAY)
    spray = coloured(bubbles(1400, 2700, 16000, 4.3, 2.6, 1.0), BRIGHT_COLOUR, lo_hz=3000)
    spray = amp(spray_db + bright_db + 1.5 * wobble(60)) * spray
    sheets = coloured(bubbles(2500, 1800, 12000, 5.4, 2.9, .4), SHEET_COLOUR, lo_hz=1500)
    sheets = swells(SHEETS, SHEET_FALL_DB_PER_S) * sheets
    fizz = coloured(bubbles(2500, 10000, 17000, 12, 2, 0.94), FIZZ_COLOUR, lo_hz=10500)
    fizz = amp(leak_db + 1.5 * wobble(25)) * fizz
    left = (1 - share) * water + share * opened + spray + sheets + fizz
    return np.array([left, wet])


def housing(x):
    """The microphone housing colours what comes in with narrow resonances and notches."""
    def response(hz):
        return amp(sum(db * np.exp(-((hz - centre) / width) ** 2) for centre, width, db in HOUSING))
    return filtered(x, response)


def wading(level_db):
    """Far splashes arrive thin and crisp: a smack and a plop, then a wash with single drops falling back."""
    gain = np.hypot(swells(FAR_STEPS, FAR_FALL_DB_PER_S), amp(FAR_WASH_DB))
    wash = coloured(bubbles(1300, 350, 9000, 10.7, 2.0, 0.99), WADING_COLOUR, lo_hz=350)
    wash = amp(level_db + 1.8 * wobble(120)) * wash
    drops = amp(FAR_DROPS_DB) * coloured(bubbles(140, 730, 5300, 14, 2.5, 0), WADING_COLOUR, lo_hz=600)
    hits = cracks(FAR_SPLASHES, level_db=-3.5, width=0.26, grain_db=1.5)
    hollows = plops(FAR_POCKETS, level_db=-7.5, rise=0.022, slap_db=-17, slap_t60=0.028)
    return gain * (wash + drops) + hits + hollows


def wind(levels, colour, level_db, lump_db):
    """Eddies buffet the microphone in low lumps."""
    buffet_db, = curves(levels)
    rumble = coloured(rng.standard_normal(N), colour, hi_hz=500)
    return amp(buffet_db + level_db) * unit(amp(lump_db * wobble(22)) * rumble)


def background(colour, level_db, lo_hz):
    """Running water and air: coloured noise, gently wavering."""
    return amp(level_db + wobble(0.49)) * coloured(rng.standard_normal(N), colour, lo_hz)


def scene():
    """Three views, one after the other: the ford, the bank and the field."""
    near_events = pockets(cycles=24.3, count=3) + smacks(level_db=-4, grain_db=2)
    near_events = near_events + glugs(level_db=0) + thumps(level_db=-1.5)
    near_events = near_events + cracks(TICKS, level_db=-5, width=0.28, grain_db=-1.0)

    stirred = stirring(STEPS_COMING, WASH_COMING)
    coming = near_events + splashing(stirred, COMING_COLOUR, churn_db=1.5, slosh_db=-0.5, spray_db=0.0,
                                     drip_db=-11, rate=550, lump_db=0.5, flicker_db=-1.0)
    coming = coming + background(FORD_FLOOR, level_db=-38.0, lo_hz=20)

    stirred = stirring(STEPS_GOING, WASH_GOING)
    going = near_events + splashing(stirred, GOING_COLOUR, churn_db=-1.0, slosh_db=-1.0, spray_db=-5.0,
                                    drip_db=-15, rate=650, lump_db=2.58, flicker_db=0.0)
    going = going + knocks(level_db=-1.5)
    going = going + wind(BREEZE, BREEZE_COLOUR, level_db=0.5, lump_db=3.0)
    going = going + background(BANK_FLOOR, level_db=-50.0, lo_hz=80)

    far = wading(level_db=1.5) + wind(GUSTS, GUST_COLOUR, level_db=-1.5, lump_db=3.0)
    far = far + background(FIELD_FLOOR, level_db=-54.0, lo_hz=300)

    # 128-sample crossfades between the views
    t = np.arange(N) / SR
    second, third = [uniform_filter1d((t > s) * 1., size=128) for s in VIEW_STARTS]
    ford = ports(coming, open_db=2, bright_db=5, leak_db=-67.0, hollow_db=-1.0, choke=0.87)
    near = (1 - second) * ford + (second - third) * going
    return housing(near) + third * far


def record(dry):
    """The camera's limiter ducks the loudest peaks in both channels alike, then all above the band limit is cut."""
    needed = np.minimum(1, CEILING / (np.abs(dry).max(axis=0) + 1e-9))
    gain = uniform_filter1d(minimum_filter1d(needed, size=256), size=256)
    return filtered(dry * gain, lambda hz: hz < TOP_HZ)


dry = scene()
out = record(dry)
digitize_waveform(out)
```